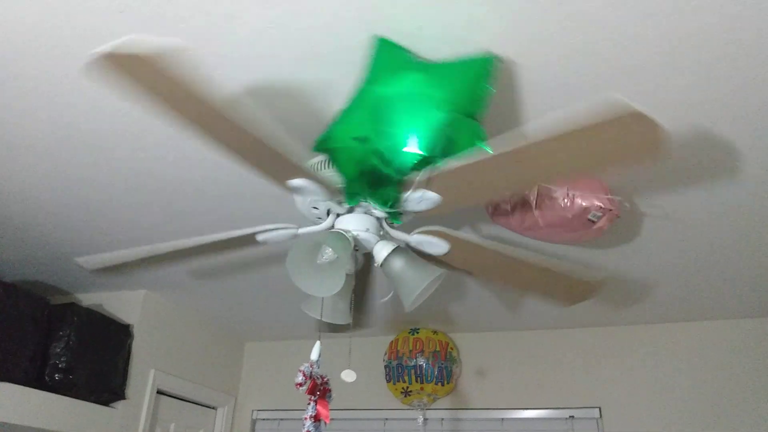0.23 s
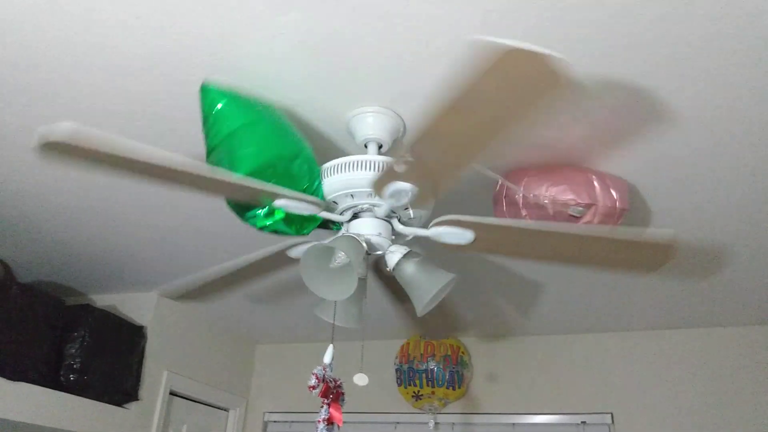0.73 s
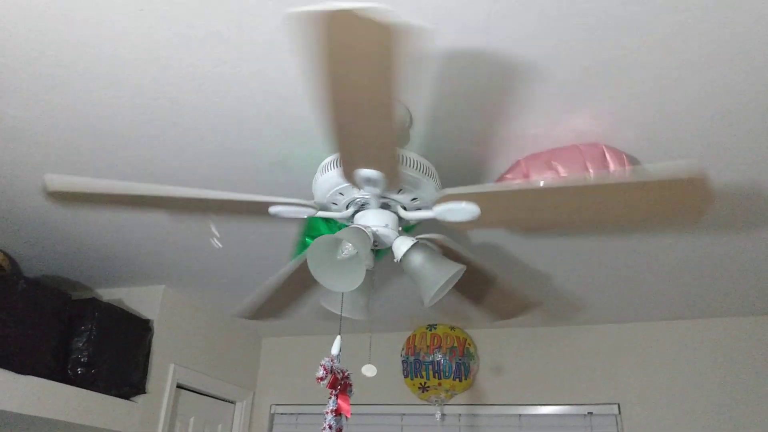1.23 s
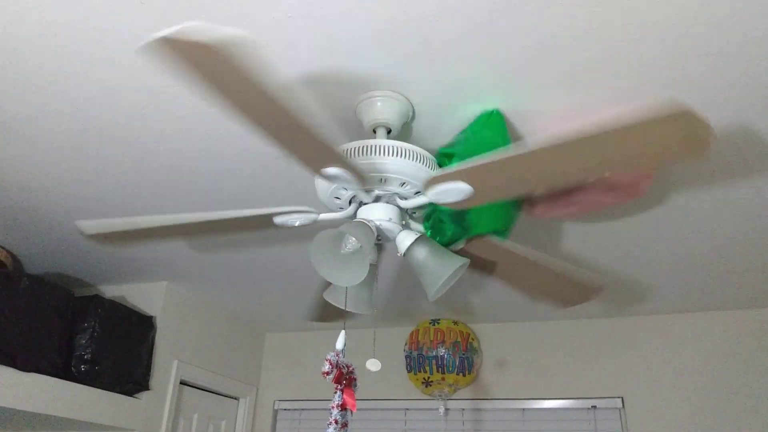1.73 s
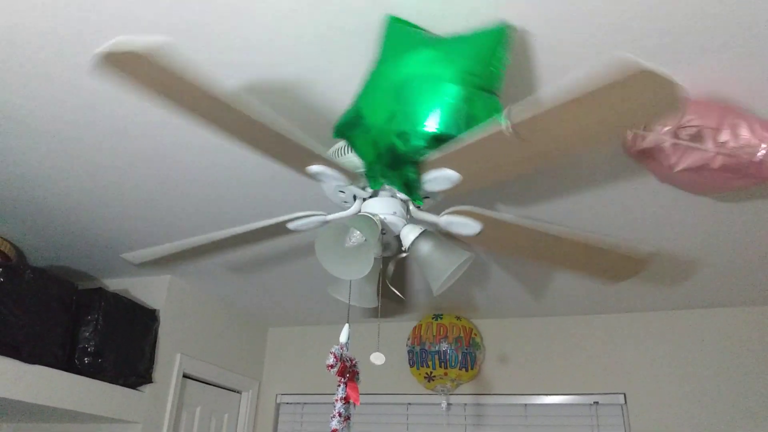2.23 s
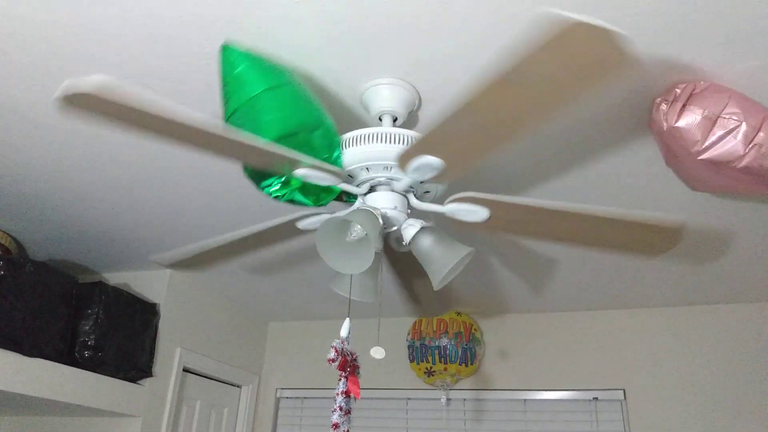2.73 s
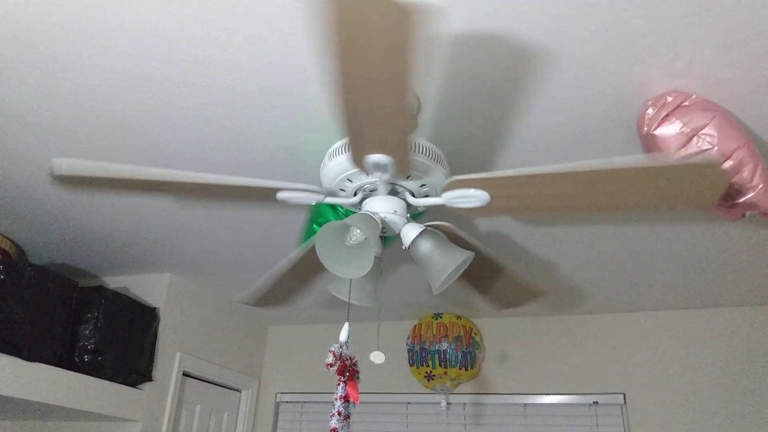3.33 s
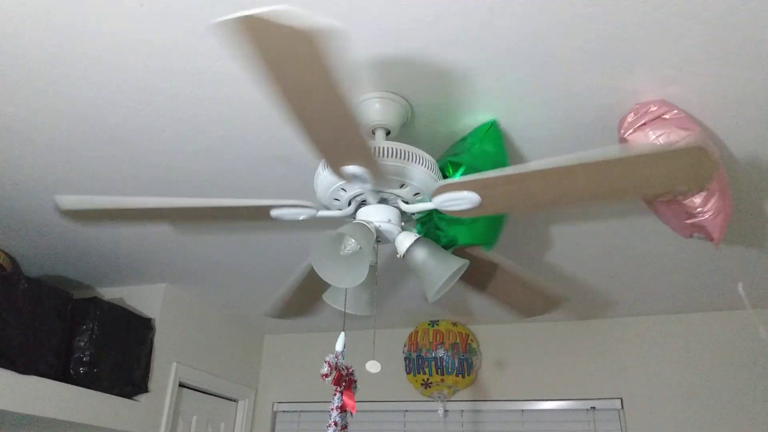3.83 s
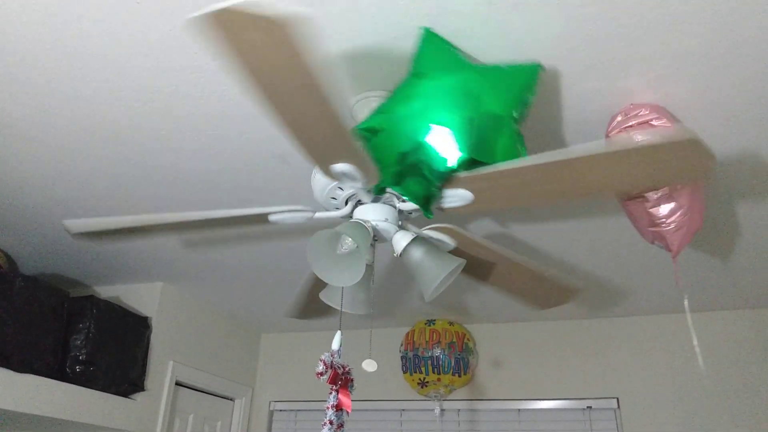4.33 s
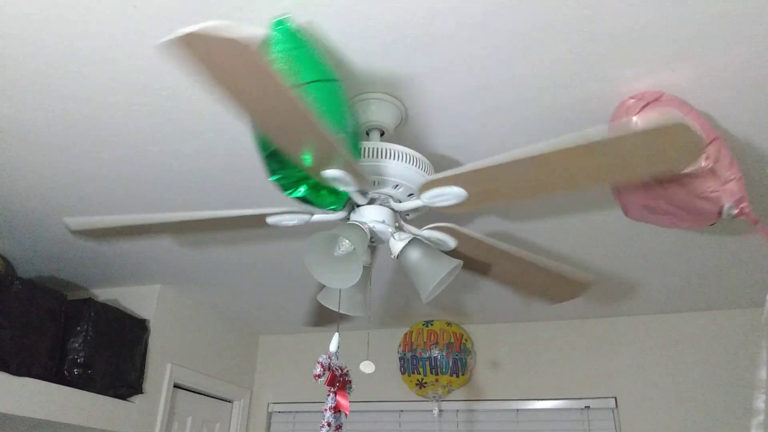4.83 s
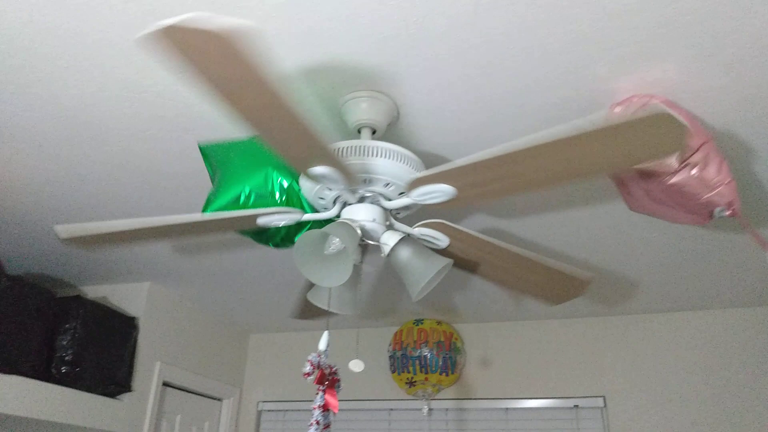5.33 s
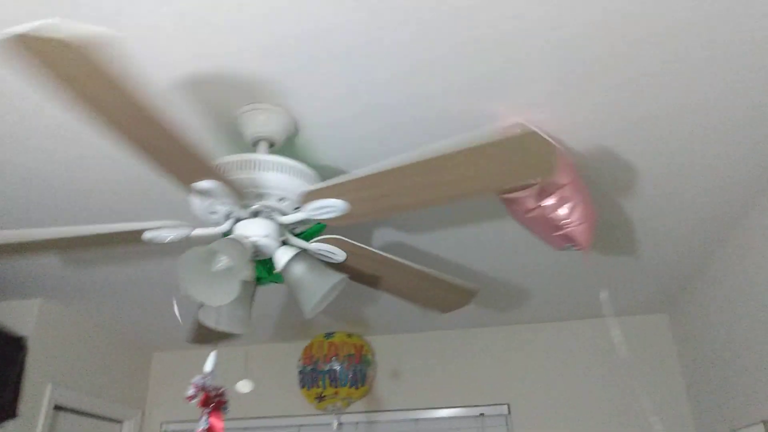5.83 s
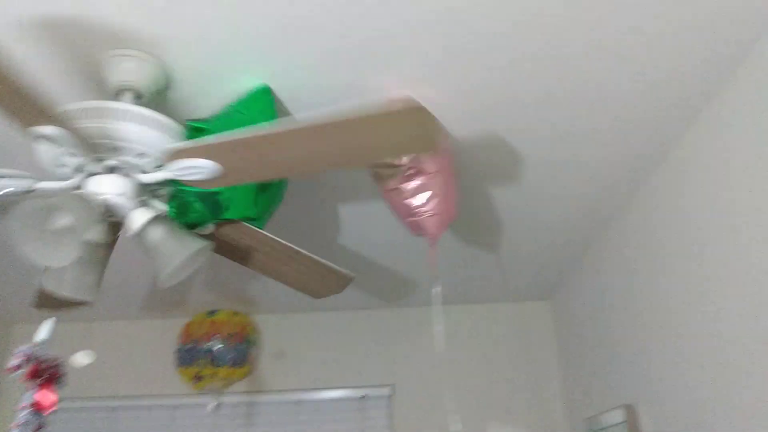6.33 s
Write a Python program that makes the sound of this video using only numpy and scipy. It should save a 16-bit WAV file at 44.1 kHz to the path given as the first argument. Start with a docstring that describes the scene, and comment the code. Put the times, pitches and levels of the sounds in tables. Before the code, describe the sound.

In a quiet room, foil balloons scrape and crinkle as a slow ceiling fan pushes them along the ceiling. Now and then a blade slaps one, giving a crisp crackle and a hollow thump. The crinkling comes in three main spells, with the sharpest slap in the third, then a few lighter bumps and a short last scrape. A faint motor murmur, soft squeak and hiss sit behind, with the treble brighter on the right.

```python
"""A quiet room, where a slow ceiling fan pushes foil balloons round under the ceiling.
The foil scrapes and crinkles in thousands of tiny slips, and the gas-filled body drums under them.
Now and then a blade slaps a balloon. Behind that are the murmur of the fan motor, a soft squeak
and a faint hiss. It is all heard through two microphone ports, the right one brighter."""
import sys
import numpy as np
from scipy import signal
from scipy.fft import rfft, irfft, next_fast_len
from scipy.io import wavfile
from scipy.ndimage import uniform_filter1d

SR = 44100
rng = np.random.default_rng(int(sys.argv[2]) if len(sys.argv) > 2 else 0)


def wrap_up_sound(samples):
    """Save the sound to the file named by the first command line argument, as 16-bit audio."""
    columns = np.atleast_2d(samples).T
    # keep every value between -1 and 1, then stretch to whole-number steps
    tamed = np.clip(columns, -1, 1)
    steps = np.round(tamed * 32767).astype(np.int16)
    wavfile.write(sys.argv[1], SR, steps)


N = 290178

# Notes at which the hollow motor housing rings: pitch_hz, width_hz, level_db
HOUSING_NOTES = [(302.4, 28, -5.5), (372, 56, -3.5), (416, 58, -11), (826, 32, -25)]
# The murmur swells, about as a blade comes round: start_s, level_db
MOTOR_SWELLS = [(0.8, -74), (0.965, -60.5), (1.276, -62), (2.93, -69.5), (3.03, -61), (3.11, -75),
                (3.378, -66), (3.59, -71.5), (3.76, -65), (5.11, -96), (5.27, -68), (5.53, -83),
                (5.92, -87), (6.1, -65), (6.24, -60.5)]
# A soft squeak in the lulls, perhaps the ribbon on the housing: time_s, level_db
SQUEAK_LEVELS = [(0.7, -64), (0.9, -74), (1.09, -100), (1.14, -87), (1.5, -75), (2.65, -71.5), (2.8, -69),
                 (3.0, -80.5), (3.13, -105), (3.378, -76), (3.68, -103), (4.9, -73), (5.17, -75.5),
                 (5.24, -86), (5.31, -73.5), (5.6, -79.5), (5.85, -87), (5.92, -85), (6.2, -80)]
# Light rustle between contacts: time_s, level_db
RUSTLE_LEVELS = [(0.95, -73.5), (1.1, -70), (1.25, -71), (1.48, -69), (2.97, -74), (3.02, -72.5),
                 (3.2, -78), (3.35, -78.5), (3.39, -72.5), (3.74, -71.5), (5.05, -75.5), (5.15, -76.5),
                 (5.34, -78.5), (5.43, -75.5), (5.6, -80), (5.87, -74.5), (5.98, -75.5), (6.2, -76.5)]
# Four drags of foil along ceiling and blade, one list each: time_s, crinkle_db, skin_db, body_db
DRAGS = [
    [(0.0, -34.5, -44.5, -46.5), (0.07, -42, -50, -54.5), (0.134, -37, -47, -47.5), (0.19, -34, -46, -54),
     (0.32, -44, -52, -55.5), (0.42, -45, -51, -58), (0.495, -41.5, -51.5, -58), (0.52, -48, -53, -59),
     (0.6, -50.5, -54.5, -64), (0.76, -62, -67, -68), (0.95, -87, -85.5, -89)],
    [(1.55, -86, -92, -81), (1.62, -47, -55, -60), (1.74, -46.5, -53, -58.5), (1.864, -36, -45.5, -51.5),
     (1.934, -33.5, -43, -46), (2.034, -47, -54.5, -58.5), (2.12, -44.5, -51.5, -55.5),
     (2.442, -47, -54.5, -62.5), (2.52, -51.5, -55.5, -60), (2.76, -71, -75, -74), (2.95, -100, -86, -87)],
    [(3.74, -78, -85, -76), (3.83, -53, -61, -68.5), (3.982, -48.5, -54, -62), (4.06, -48.5, -54, -57),
     (4.222, -49, -53, -54.5), (4.33, -50, -54, -55), (4.42, -51.5, -56.5, -63), (4.64, -56.5, -59, -69.5),
     (4.92, -74, -73, -76.5), (5.1, -96, -86.5, -79.5)],
    [(6.19, -79, -85, -88), (6.245, -53, -63, -59), (6.3, -53.5, -61.5, -86), (6.46, -51, -58.5, -75),
     (6.52, -50, -56.5, -80), (6.58, -52, -56.5, -61)],
]
# Blade slaps and bounces: start_s, crinkle_db, skin_db, body_db, fade_s, knock_boost_db
BLADE_SLAPS = [(0.4274, -44, -73.5, -59, 0.22, 8), (0.6153, -46, -42, -44, 0.08, 19.5),
               (0.688, -44.5, -42, -54, 0.067, 16), (1.288, -51, -90, -80, 0.25, 4),
               (1.48, -57, -69, -74, 0.053, 11), (1.5557, -47, -55, -54.5, 0.13, 6),
               (1.579, -33.5, -45.5, -49, 0.13, 8), (1.5948, -37, -43, -58, 0.056, 9),
               (1.65, -49, -50, -68, 0.049, 7), (2.0997, -26.5, -57, -65, 0.031, 11.5),
               (3.0013, -69, -75, -78, 0.15, 12), (3.375, -61, -72.5, -95, 0.26, 21),
               (4.226, -54, -57, -67, 0.12, 24), (4.659, -40.5, -43, -47, 0.37, 2),
               (4.667, -21.5, -34.5, -40, 0.2, -1), (4.878, -51, -61.5, -67, 0.13, 13),
               (5.372, -72.5, -81, -69, 0.6, 12), (5.42, -61, -89, -83, 0.1, 10),
               (5.626, -46, -53, -56.5, 0.33, 12), (5.736, -53, -57.5, -59, 0.15, 7),
               (5.8977, -78, -68, -68, 0.24, 19)]

# Each tone says how strong a sound is from bass to treble: frequency_hz, relative_db
HISS_TONE = [(60, -22), (110, -24), (180, -41), (400, -33), (650, -43), (850, -38), (1000, -35),
             (1900, -14.5), (2400, -12.5), (3300, -30), (4190, -10.5), (4800, -16.5), (5560, -15),
             (6400, -24), (9000, -17.5), (13000, -21), (16000, -22.5)]  # faint rustling
SHEEN_TONE = [(5500, -34.5), (7000, -6), (9200, -2.5), (11000, -4.5), (12500, -26), (16000, -28)]  # the finest slips
SNAP_TONE = [(5000, -30), (10000, -10), (13000, 0), (15000, -8), (18000, -40)]  # a crease snapping
CRINKLE_TONE = [(3410, -40), (5800, -7.5), (8750, -5), (12000, -7.5), (15600, -12.5), (22000, -120)]  # crinkling foil
SIZZLE_TONE = [(7060, -42.5), (12000, -0.5), (15100, 0), (16000, 2), (18000, -27)]  # its highest treble
RASP_TONE = [(1760, -34), (3000, -9), (3440, 5.5), (4260, 8.5), (4860, 4.5), (6000, 0), (7800, -43.5),
             (13200, -120)]  # its lower scrape
SKIN_TONE = [(320, -25.5), (550, -2.5), (800, -1), (882, 3), (1070, -1), (1280, 2), (1690, -2.5), (2370, 1),
             (2760, -3.5), (3300, -0.5), (4290, -65.5), (7260, -120)]  # the tight skin
BODY_TONE = [(71, -40), (120, -14), (172, -4.5), (210, -0.5), (254, 2.5), (388, 6), (456, -2), (507, 2.5),
             (750, -28.5), (980, -36.5), (1650, -120)]  # the gas-filled body
PUSH_TONE = [(15, -82), (25, -30), (48, -29), (75, -1), (108, 2), (150, -11.5), (200, -18), (330, -120)]  # the air it pushes

# How alike the two sides are (1 is the same): frequency_hz, likeness
SIDE_LIKENESS = [(30, 0.49), (100, 0.82), (200, 0.88), (350, 0.89), (700, 0.32), (1400, 0.004),
                 (16000, 0.069)]
# How the microphone ports differ: frequency_hz, left_minus_right_db
PORT_BALANCE = [(2500, 0), (4500, -0.5), (8500, -7.5), (13000, -3.5)]

# In a drag, sizzle and rasp follow the crinkle, and push follows the body: base_db, slope
SIZZLE_RULE, RASP_RULE, PUSH_RULE = (-64, 0.88), (-59, 1), (-65.5, 2)
SLAP_SIZZLE_DB, SLAP_RASP_DB, SLAP_PUSH_DB = -59, -11, -19  # in a slap, added to the level they follow
SLAP_RISE_S, SLAP_RISE_RULE = 0.0064, (0, 0.35)  # rise of a -50 dB slap; harder ones take longer


def amp(db):
    """Turn decibels into a gain."""
    return 10 ** (np.asarray(db) / 20)


def unit_level(x):
    """Scale a signal to an average power of 1."""
    return x / np.sqrt(np.mean(x ** 2) + 1e-20)


def over_time(rows):
    """Join timed rows with straight lines, one curve per level column."""
    times, *columns = np.transpose(rows)
    return [np.interp(np.arange(N) / SR, times, column) for column in columns]


def at_hz(rows, hz):
    """Read a table at the given frequencies."""
    table = np.array(rows)
    return np.interp(np.log(hz + 1), np.log(table[:, 0] + 1), table[:, 1])


def follow(leader_db, rule):
    """Give base_db when the leader is at -50 dB, and move by slope for each dB it moves."""
    base_db, slope = rule
    return base_db + slope * (leader_db + 50)


def rise_and_fade(rise_s, fade_s, t):
    """A quick rise, then a fall of 60 dB every fade_s."""
    return (1 - np.exp(-t / max(rise_s, 2e-4))) * amp(-60 * t / max(fade_s, .01))


def smooth(noise, hold):
    """Smooth noise twice; the nearer hold is to 1, the slower it moves."""
    return signal.lfilter([1], [1, -2 * hold, hold * hold], noise)


def drift(rate_hz):
    """A slow random wobble, about 1 in size."""
    slow = smooth(rng.standard_normal(N // 40 + 2002), np.exp(-80 * np.pi * rate_hz / SR))[2000:]
    return np.interp(np.arange(N) / 40, np.arange(len(slow)), unit_level(slow))


def click(tone):
    """A click with the given tone and an energy of 1."""
    cepstrum = irfft(at_hz(tone, np.linspace(0, SR / 2, 4097)) * np.log(10) / 20)
    cepstrum[1:4096] *= 2  # these two lines pack the energy at the start
    cepstrum[4097:] = 0
    pulse = irfft(np.exp(rfft(cepstrum)))
    return pulse / np.sqrt(np.sum(pulse ** 2))


def with_tone(pair, tone):
    """Filter two signals to give them a tone."""
    return signal.fftconvolve(pair, click(tone)[None])[:, :N]


def flicker_bands(x, depth_db, hold, bands):
    """Narrow frequency bands swell and fade at random, giving a streaky, watery shimmer."""
    cells = signal.stft(x, nperseg=512, noverlap=384)[2]  # side, frequency band, moment
    flicker = smooth(rng.standard_normal(cells.shape[1:]), hold)
    gain = amp(depth_db * unit_level(uniform_filter1d(flicker, size=bands, axis=0)))
    return signal.istft(cells * unit_level(gain), nperseg=512, noverlap=384)[1][:, :N]


def spread(pair):
    """Two unrelated signals become left and right, alike in the bass and unlike in the treble."""
    size = next_fast_len(N)
    alike = np.clip(at_hz(SIDE_LIKENESS, np.linspace(0, SR / 2, size // 2 + 1)), 0, 1)
    mid, side = rfft(pair, size) * np.sqrt([1 + alike, 1 - alike]) / np.sqrt(2)
    return irfft([mid + side, mid - side], size)[:, :N]


def shadow(x, pan_db):
    """Treble above about 3 kHz is shadowed on one side; a negative pan_db dulls the left."""
    low = signal.sosfiltfilt(signal.butter(2, 3200, fs=SR, output="sos"), x)
    return low + (x - low) * amp([[pan_db / 2], [-pan_db / 2]])


def room_echo(x, fade_s, level_db):
    """Many reflections blur into a dull, fading tail of noise, one for each side."""
    t = np.arange(round(.6 * SR)) / SR
    tail = rng.standard_normal((2, len(t))) * amp(-60 * t / fade_s) * (t > .004)
    tail = signal.lfilter([1], [1, -.3], tail)
    tail /= np.sqrt(np.sum(tail ** 2, axis=1, keepdims=True))
    return amp(level_db) * signal.fftconvolve(x, tail, axes=1)[:, :N]


def motor(resting_db, low_hz, high_hz):
    """Rough magnetic forces ring the hollow housing, and each note wavers on its own."""
    walls = signal.butter(3, [low_hz, high_hz], "band", fs=SR, output="sos")
    murmur = 0
    for pitch_hz, width_hz, level_db in HOUSING_NOTES:
        hold = np.exp(-np.pi * width_hz / SR)
        ring = [1, 0, -1.016], [1, -2 * hold * np.cos(2 * np.pi * pitch_hz / SR), hold * hold]
        forces = rng.standard_normal((2, N))
        note = signal.lfilter(*ring, signal.lfilter(*ring, forces))
        if pitch_hz < high_hz:  # the walls muffle all but the top note
            note = signal.sosfilt(walls, note)
        murmur = murmur + amp(level_db + 1.7 * drift(14)) * unit_level(note)
    loudness = np.full(N + SR, amp(resting_db))
    swell = rise_and_fade(rise_s=0.012, fade_s=0.7, t=np.arange(SR) / SR)
    for start_s, level_db in MOTOR_SWELLS:
        loudness[round(start_s * SR):][:SR] += amp(level_db) * swell
    return loudness[:N] * murmur


def squeak(pitch_hz, wander_hz, width_hz):
    """A narrow band of noise rides on a wandering pitch."""
    flutter = unit_level(smooth(rng.standard_normal((2, 2, N)), np.exp(-np.pi * width_hz / SR)))
    phase = 2 * np.pi * np.cumsum(pitch_hz + wander_hz * drift(1.5)) / SR
    return amp(over_time(SQUEAK_LEVELS)[0]) * (flutter[0] * np.cos(phase) + flutter[1] * np.sin(phase))


def slips(per_s, uneven_db, clump_db):
    """Two streams of tiny foil slips, uneven in size, that swell and dip together."""
    sizes = amp(uneven_db * np.minimum(rng.exponential(1, N), 5))
    slipping = rng.random(N) < per_s / SR
    clumps = amp(clump_db * (drift(66) + 1.5 * drift(6.3)))
    return unit_level(rng.standard_normal((2, N)) * sizes * slipping * clumps)


def rustle(sheen_db):
    """A faint, flickering hiss; a bright sheen of the finest slips rises and falls with it."""
    hiss = with_tone(rng.standard_normal((2, N)), HISS_TONE)
    sheen = with_tone(slips(per_s=9000, uneven_db=-2.5, clump_db=1.2), SHEEN_TONE)
    level_db = over_time(RUSTLE_LEVELS)[0]
    hiss = flicker_bands(hiss, depth_db=6.0, hold=0.87, bands=2)
    return amp(level_db) * hiss + amp(sheen_db + level_db - level_db.mean()) * sheen


def crease_snap(start_s, level_db):
    """One crease in the foil snaps with a thin, high tick."""
    snap, pulse = np.zeros(N + SR), click(SNAP_TONE)
    snap[round(start_s * SR):][:len(pulse)] = amp(level_db) * pulse
    return snap[:N] * [[1], [0]]  # spread() sends the first signal to both sides


def blade_slaps():
    """Each slap crushes the foil, quickly rising and then fading; the blade edge adds one knock."""
    crushes, knocks = np.zeros((2, 6, N + SR))  # one row for each of the six balloon sounds
    t = np.arange(SR // 2) / SR
    for start_s, crinkle_db, skin_db, body_db, fade_s, knock_boost_db in BLADE_SLAPS:
        start = round(start_s * SR)
        levels = amp([crinkle_db, crinkle_db + SLAP_SIZZLE_DB, crinkle_db + SLAP_RASP_DB,
                      skin_db, body_db, body_db + SLAP_PUSH_DB])
        rise_s = SLAP_RISE_S * amp(follow(crinkle_db, SLAP_RISE_RULE))
        crushes[:, start:start + len(t)] += np.outer(levels, rise_and_fade(rise_s, fade_s, t))
        knocks[:, start] += levels * amp(knock_boost_db)
    return crushes[:, :N], knocks[:, :N]


def balloons():
    """The same slips shake the foil, the tight skin, the gas-filled body and the air around it."""
    crushes, knocks = blade_slaps()
    crinkle_db, skin_db, body_db = over_time(np.concatenate(DRAGS))
    drags = amp([crinkle_db, follow(crinkle_db, SIZZLE_RULE), follow(crinkle_db, RASP_RULE),
                 skin_db, body_db, follow(body_db, PUSH_RULE)])
    tones = CRINKLE_TONE, SIZZLE_TONE, RASP_TONE, SKIN_TONE, BODY_TONE, PUSH_TONE
    scrape = slips(per_s=14000, uneven_db=-0.5, clump_db=-0.12)
    *foil, body, push = [with_tone(scrape * force + knock * [[1], [0]], tone)
                         for force, knock, tone in zip(drags + crushes, knocks, tones)]
    return flicker_bands(sum(foil), depth_db=2.5, hold=0.879, bands=3) + body + push


def scene():
    """The balloons and their echo, over a quiet background whose treble leans to the right."""
    foil = balloons() + crease_snap(start_s=6.5013, level_db=-26)
    background = motor(resting_db=-81, low_hz=229, high_hz=550)
    background += squeak(pitch_hz=1428, wander_hz=50.6, width_hz=195)
    background += rustle(sheen_db=-71.5)
    foil += room_echo(foil, fade_s=0.17, level_db=-12.5)
    return shadow(spread(foil), pan_db=-1) + shadow(spread(background), pan_db=-15)


def record(dry):
    """The right microphone port hears more treble; both lose everything above 16 kHz."""
    size = next_fast_len(N)
    tilt_db = at_hz(PORT_BALANCE, np.linspace(0, SR / 2, size // 2 + 1)) / 2
    ports = irfft(rfft(dry, size) * amp([tilt_db, -tilt_db]), size)[:, :N]
    return signal.sosfilt(signal.cheby2(20, 60, 16000, fs=SR, output="sos"), ports)


dry = scene()
out = record(dry)
wrap_up_sound(out)
```